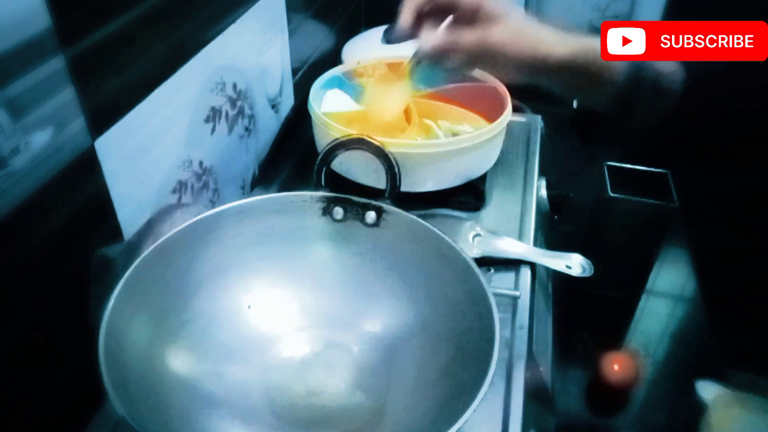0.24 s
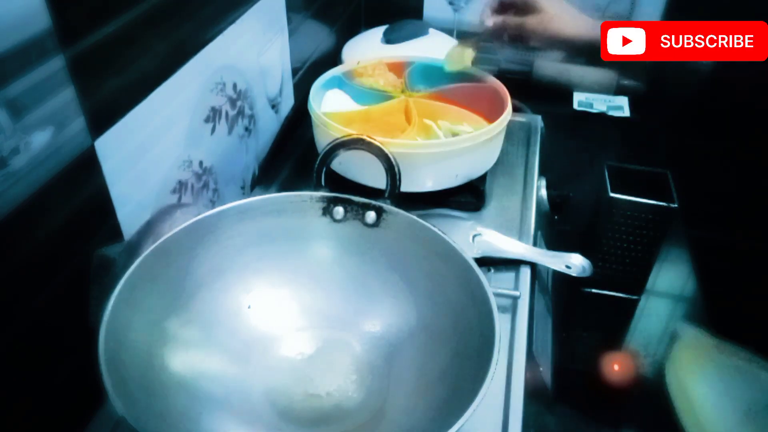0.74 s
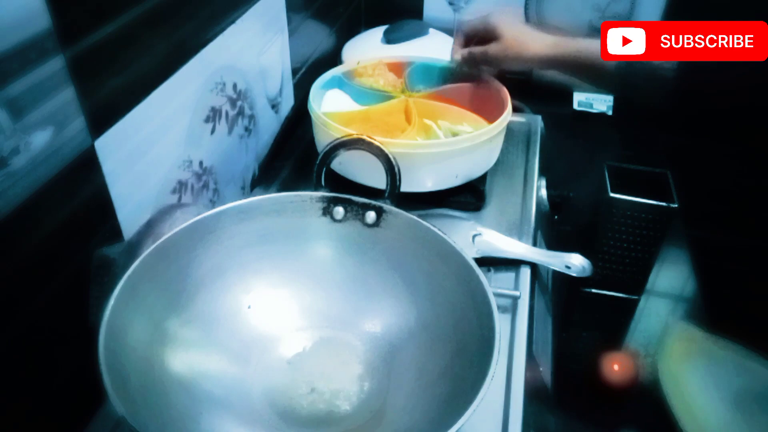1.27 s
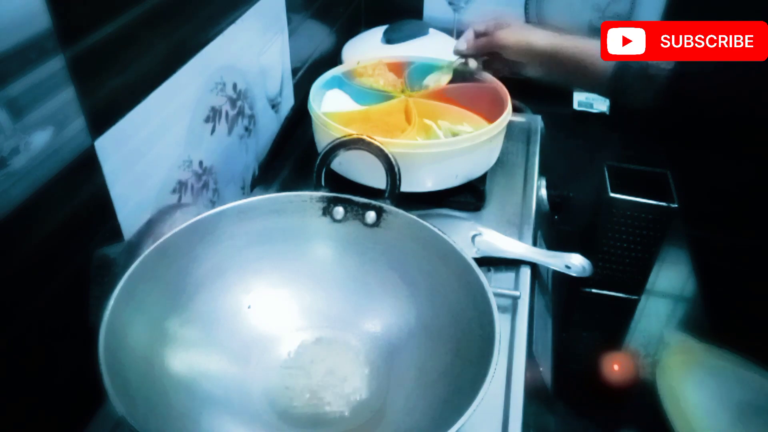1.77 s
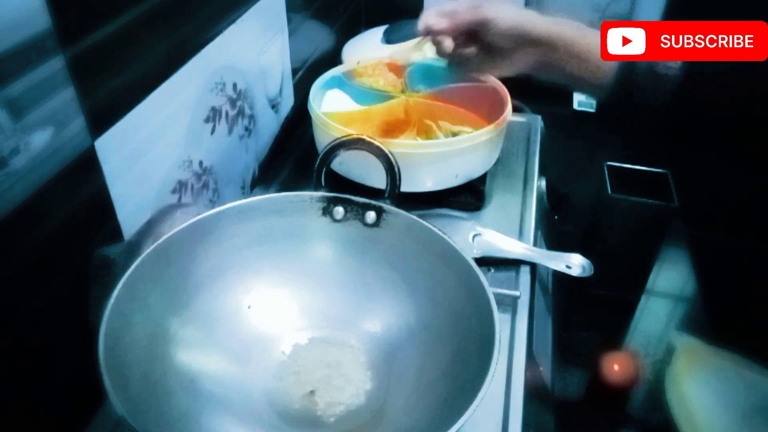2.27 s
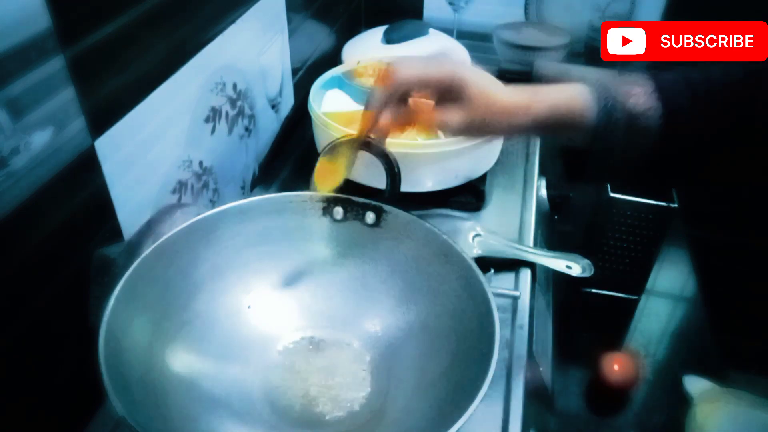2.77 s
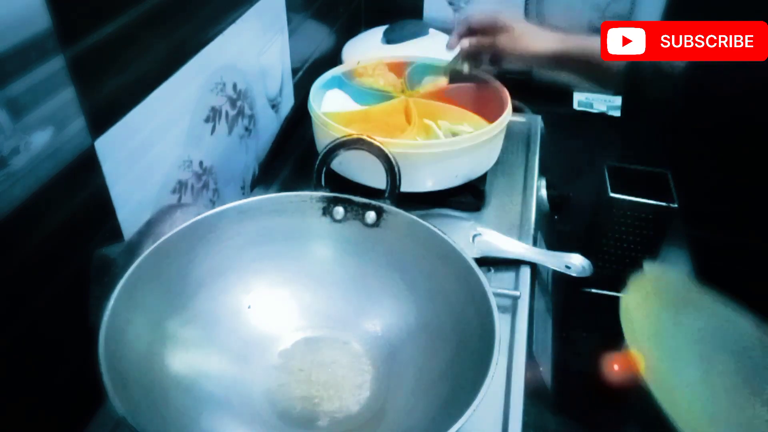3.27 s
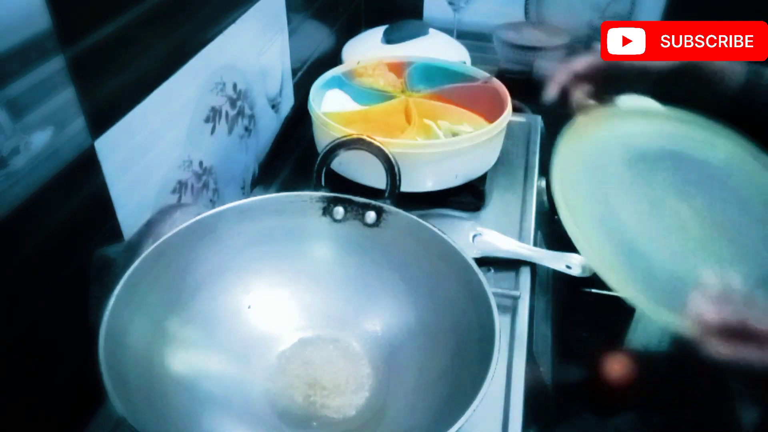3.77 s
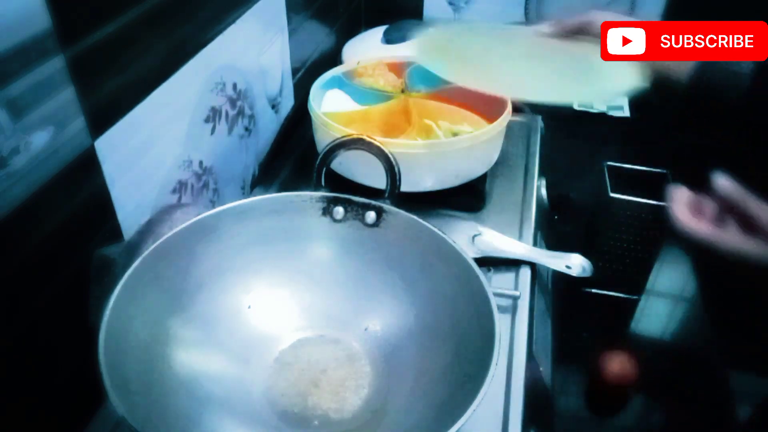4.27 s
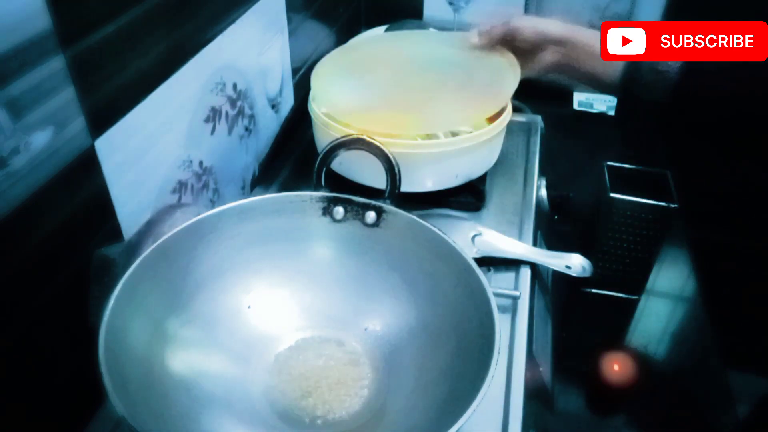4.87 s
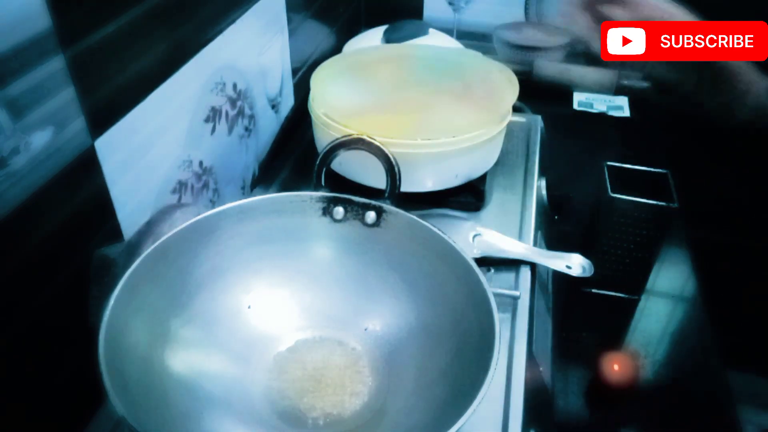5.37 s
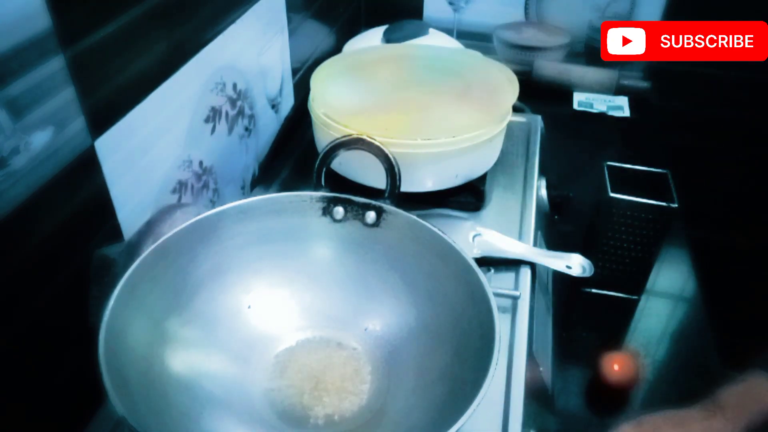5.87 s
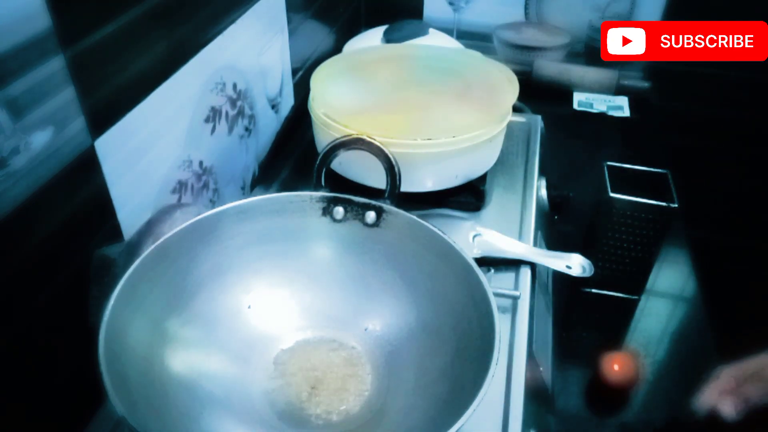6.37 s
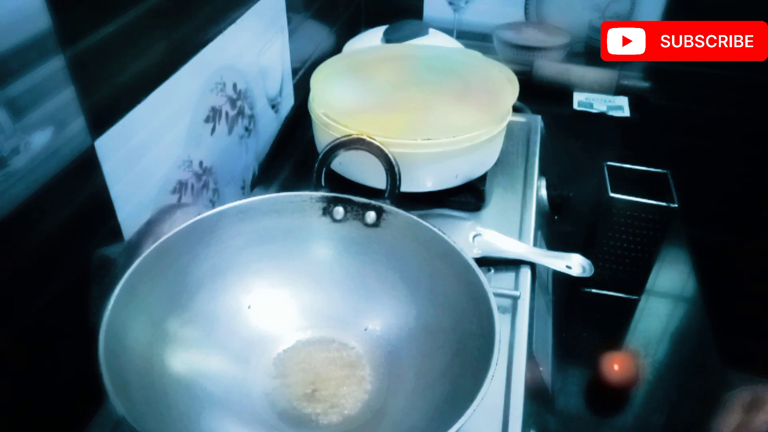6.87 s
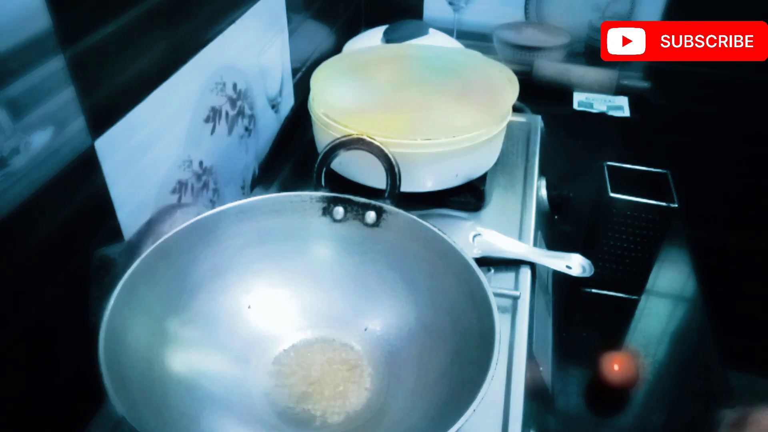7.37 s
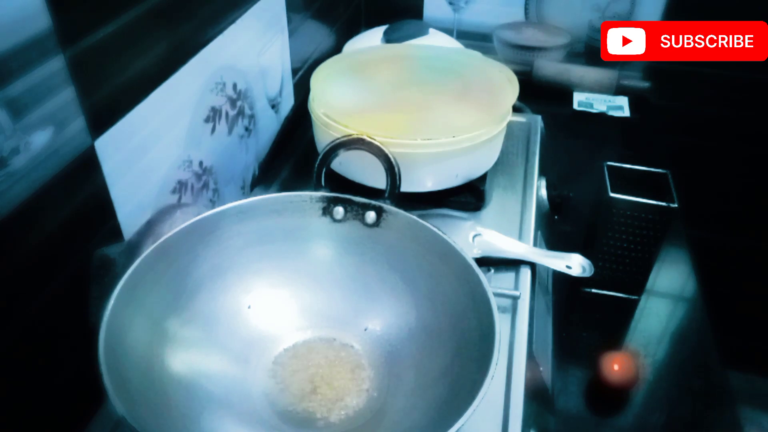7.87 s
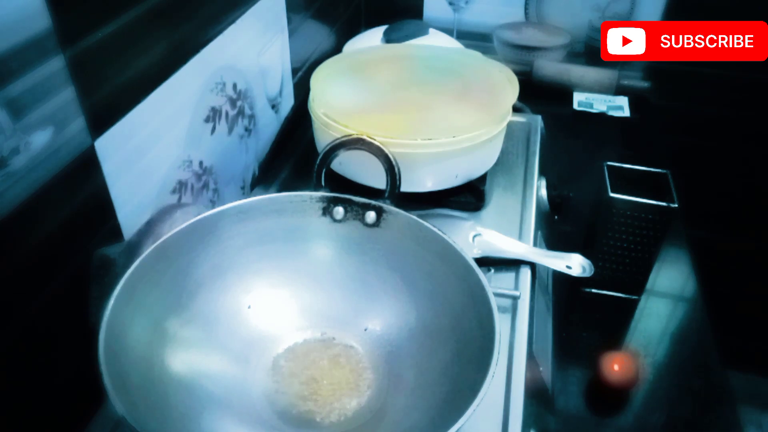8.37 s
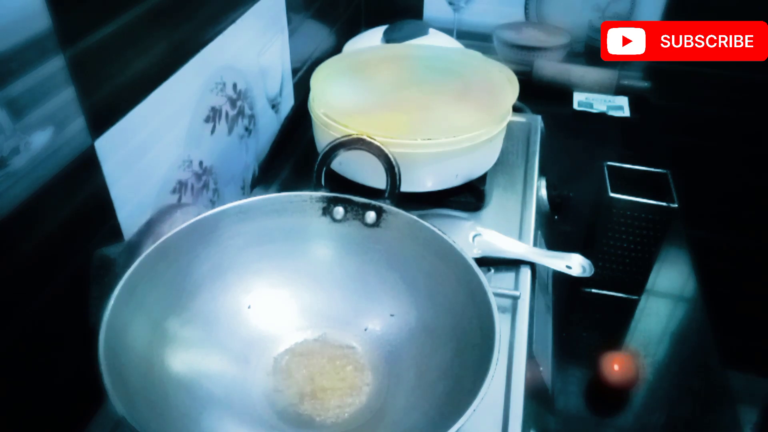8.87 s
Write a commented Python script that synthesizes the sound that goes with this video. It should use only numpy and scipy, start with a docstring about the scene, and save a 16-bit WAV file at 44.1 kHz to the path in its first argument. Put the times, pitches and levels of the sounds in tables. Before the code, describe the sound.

Close, bright seed pops snap in a wok in a small hard kitchen, with faint hiss, a brief spoon clink and hollow plastic lid clunks.

```python
"""Spice seeds popping in hot oil

Spice seeds burst in a wok, close to a phone in a small hard kitchen, over sizzling oil and a low wavering hum.
Each pop is a short crack with a ring, made by giving a spectrum its shortest response; wok and walls answer.
Some pops also thump the microphone with a swing of a few milliseconds.
A spoon drops and a lid settles on a plastic spice box: dying sines, with noisy cracks for every blow on the
box, spoon and lid alike. The sizzle is coloured noise with random bubble clicks; rumble and hum are filtered noise."""
import sys
import numpy as np
from scipy import signal
from scipy.fft import rfft, irfft
from scipy.io import wavfile
from scipy.ndimage import uniform_filter1d

SR = 44100
rng = np.random.default_rng(int(sys.argv[2]) if len(sys.argv) > 2 else 0)


def unload_audio(sound):
    """Save the sound as a 16-bit wav file, at the path given as the first command line argument."""
    columns = np.transpose(np.atleast_2d(sound))
    # keep every value between -1 and 1, then stretch to whole-number steps
    steps = np.round(np.clip(columns, -1, 1) * 32767)
    wavfile.write(sys.argv[1], SR, steps.astype(np.int16))


N = 402191


def undb(db):
    """Decibels to amplitude gain."""
    return 10 ** (np.asarray(db) / 20)


def unit(x):
    """Scale to rms 1."""
    return x / np.sqrt(np.mean(x ** 2))


def even(rows):
    """Give every row energy 1."""
    return rows / np.sqrt((rows ** 2).sum(-1, keepdims=True))


def band(x, lo_hz, hi_hz):
    """Butterworth band-pass."""
    edges_hz = [lo_hz, min(hi_hz, .48 * SR)]
    return signal.sosfilt(signal.butter(2, edges_hz, "band", fs=SR, output="sos"), x)


def curve(table):
    """Turn (time [s], level [dB]) points into a gain per sample."""
    s, db = np.transpose(table)
    return undb(np.interp(np.arange(N) / SR, s, db))


def colour(x, points):
    """Shape noise by (frequency [Hz], level [dB]) points joined on a log-frequency axis."""
    hz, db = np.transpose(points)
    f = np.maximum(np.arange(len(x) // 2 + 1) * SR / len(x), 1)
    gain_db = np.interp(np.log(f), np.log(hz), db, left=-90, right=-90)
    return irfft(rfft(x) * undb(gain_db), len(x))


def walk(rate_hz):
    """Slide between random levels drawn at this rate; spread a little under 1."""
    hold = int(SR / rate_hz)
    steps = np.repeat(rng.standard_normal(N // hold + 1), hold)
    return uniform_filter1d(steps, hold)[:N]


def place(times, sounds):
    """Lay one row of samples at each time."""
    out = np.zeros(N + SR)
    for s, row in zip(times, sounds):
        start = int(s * SR)
        out[start:start + len(row)] += row
    return out[:N]


def burst(count, decay_ms, t):
    """Dying puffs of noise, each of energy 1."""
    return even(rng.standard_normal((count, len(t))) * np.exp(-t / decay_ms * 1000))


def hump(hz, octaves):
    """A bell of power on a log-frequency axis, total 1."""
    f = np.maximum(np.arange(257), .5) * SR / 512
    bell = np.exp(-.5 * (np.log2(f / hz) / np.maximum(octaves, .03)) ** 2) / f
    return bell / bell.sum(-1, keepdims=True)


def causal(power):
    """The shortest (minimum-phase) response with this power spectrum, by folding the cepstrum."""
    floor = 1e-7 * power.max(-1, keepdims=True)
    cepstrum = irfft(.5 * np.log(256 * power + floor))
    cepstrum[:, 1:256] *= 2
    cepstrum[:, 257:] = 0
    return irfft(np.exp(rfft(cepstrum)))


def rings(modes, t):
    """Dying sines, one row per (frequency [Hz], level [dB], t60 [s]) mode; returns frequencies and rows."""
    hz, db, t60 = (c[:, None] for c in np.transpose(modes))
    return hz, undb(db) * np.sin(2 * np.pi * hz * t) * np.exp(-np.log(1000) * t / t60)


# Rumble colour: (frequency [Hz], relative level per Hz [dB])
RUMBLE_COLOUR = [(15, -76), (25, -32.5), (58, -13), (96, -10), (162, -7), (278, -13), (546, -13.5),
                 (578, -12), (866, -14.5), (2500, -31.5), (3250, -52), (5500, -120)]
# Hum level before its random waver: (time [s], level [dB])
HUM_LEVEL = [(0.0, -70.5), (0.33, -84.5), (0.96, -76), (1.6, -82), (1.8, -62.5), (2.0, -89.5),
             (2.77, -73.5), (3.3, -79), (3.83, -86), (4.39, -75), (4.7, -87), (5.08, -56), (5.3, -76),
             (7.6, -85), (7.9, -66), (8.05, -84), (8.28, -74), (8.55, -86), (8.85, -73), (9.12, -93)]
RUMBLE_DB = -78


def air():
    """Noise coloured as room rumble, and a narrow noise band near 94 Hz as a hum that swells and fades."""
    rumble = unit(colour(rng.standard_normal(N + 1), RUMBLE_COLOUR)[:N])
    rumble = rumble * undb(RUMBLE_DB + 0.53 * walk(4))
    hum = unit(band(rng.standard_normal(N), 84.3, 103.7))
    return rumble + hum * curve(HUM_LEVEL) * undb(1.5 * walk(5))


# Hot oil colour: (frequency [Hz], relative level per Hz [dB])
OIL_COLOUR = [(710, -33.5), (1200, -11.5), (1430, -4), (2030, -7), (2530, -2.5), (4010, -7), (4940, -0.5),
              (7410, 1.5), (12100, -16), (15300, -3), (16000, -0.5), (16500, -49.5)]
# Sizzle level before its random flicker: (time [s], level [dB])
SIZZLE_LEVEL = [(0.0, -71.5), (1.5, -60), (1.85, -57), (2.3, -64.5), (2.7, -61), (3.0, -63.5), (4.7, -63.5),
                (6.7, -67.5), (7.6, -65), (8.45, -56.5), (8.8, -73), (9.12, -63)]
BUBBLES_PER_S = 1500


def sizzle():
    """Tiny bubbles of uneven size click at random within a steady hiss, coloured as oil and flickering."""
    size = undb(1.8 * rng.exponential(size=N))
    fires = rng.random(N) < BUBBLES_PER_S / SR
    bubbles = size * fires * rng.standard_normal(N)
    fizz = unit(bubbles) * .5 + rng.standard_normal(N)
    # one extra sample makes the length even for the transform
    hiss = unit(colour(np.append(fizz, 0), OIL_COLOUR)[:N])
    return hiss * curve(SIZZLE_LEVEL) * undb(2.5 * walk(15))


# Kitchen echoes by band: (centre [Hz], t60 [s], level before scaling by root frequency [dB])
ROOM_BANDS = [(232, 0.76, -23.5), (700, 0.33, -24.5), (1940, 0.32, -25), (4770, 0.27, -26.5),
              (8540, 0.38, -31), (11520, 0.13, -33), (16100, 0.13, -30.5)]


def kitchen():
    """Wall echoes as noise: they thicken over the first milliseconds, then each band dies at its own pace."""
    t = np.arange(int(.7 * SR)) / SR
    out = 0
    for hz, t60, db in ROOM_BANDS:
        noise = unit(band(rng.standard_normal(len(t)), hz / 1.57, hz * 1.64)) * np.sqrt(hz / SR)
        out = out + undb(db) * noise * np.exp(-np.log(1000) * t / t60)
    return out * (1 - np.exp(-(t / 0.005) ** 2))


# Spoon modes: (frequency [Hz], relative level [dB], t60 [s])
SPOON_MODES = [(3214, -4, .2), (4005, -4, .2), (5889, -6, .15), (7811, 0, .17), (9744, -4, .17),
               (12660, -16, .15)]
SPOON_S, SPOON_DB = 3.589, -47.5


def spoon():
    """The dropped spoon rings once in a handful of high, quickly dying modes."""
    t = np.arange(int(.8 * SR)) / SR
    return place([SPOON_S], [undb(SPOON_DB) * rings(SPOON_MODES, t)[1].sum(0)])


# Knocks of spoon and lid on the spice box: (time [s], low crack energy [dB], low crack [Hz],
# high crack [Hz], high crack spread [octaves], base pitch [Hz], then against the low crack energy:
# high crack [dB], base [dB], hollow note [dB])
BOX_KNOCKS = [(1.3743, -27, 1470, 1270, 0.2, 256, 2, -30.5, -59),
              (3.5876, -12, 890, 2085, 0.082, 270, -0.5, -31.5, -37.5),
              (3.6617, -37, 850, 2160, 0.2, 260, 3, -48, -32),
              (3.7087, -38, 850, 2170, 0.18, 260, 2, -45, -45),
              (4.894, -10, 600, 1530, 0.54, 171, 0.5, -36.5, -34.5),
              (5.011, -18.5, 625, 1140, 0.44, 200, -9, -23, -37),
              (5.2393, -18.5, 680, 1300, 0.62, 247, -15, -31.5, -26),
              (5.352, -28.5, 700, 1055, .2, 256, -18, -36, -20.5),
              (5.665, -39.5, 656, 1650, .27, 227, 1, -22.5, -44)]
# Box walls: (frequency [Hz], relative level [dB], t60 [s])
BOX_WALLS = [(600, -30, 0.13), (640, 2, .15), (757, 5, 0.068), (1080, -23, .12), (1116, 3.5, 0.16),
             (1370, -7, 0.22)]
# Box base: (frequency [Hz], relative level [dB], t60 [s])
BOX_BASE = [(127.4, 4, 0.76), (155, 2, 0.37), (200, -2.5, 0.27), (241, -7, 0.63), (270, 0.5, 0.4),
            (304.6, -3, 0.88), (364, 4.5, 0.31)]
# Air in the box, a close pair that beats: (frequency [Hz], relative level [dB], t60 [s])
BOX_HOLLOW = [(433.5, 0, .5), (444, -1.5, .5)]
LOW_CRACK_OCTAVES = .46
# click added to the high crack; walls against the low crack energy
CLICK_DB, WALLS_DB = -7.5, -36


def knocks():
    """Each blow is a woody crack in two bands that wakes walls, base and air of the box; returns all, and cracks."""
    t = np.arange(int(.8 * SR)) / SR
    walls = rings(BOX_WALLS, t)[1]
    # the two start against each other, so the note swells first
    hollow = np.subtract(*rings(BOX_HOLLOW, t)[1])
    base_hz, base = rings(BOX_BASE, t)
    swell = 1 - np.exp(-t / 0.0056)
    cracks, notes = [], []
    for s, db, low_hz, high_hz, octaves, pitch_hz, high_db, base_db, hollow_db in BOX_KNOCKS:
        high = hump(high_hz, octaves) + undb(2 * CLICK_DB) * hump(3300, 0.53)
        power = hump(low_hz, LOW_CRACK_OCTAVES) + undb(2 * high_db) * high
        puff = burst(1, 4.5, t[:1500])[0]
        cracks.append(undb(db) * np.convolve(causal(power[None])[0], puff))
        # every blow wakes the wall modes a little differently
        uneven = (undb(2.0 * rng.standard_normal((len(BOX_WALLS), 1))) * walls).sum(0)
        # the place of the blow picks the base modes near one pitch
        nearness = np.exp(-.5 * (np.log2(base_hz / pitch_hz) / .25) ** 2)
        picked = (nearness * base).sum(0)
        tone = swell * (undb(base_db) * picked + undb(hollow_db) * hollow)
        notes.append(undb(db) * (undb(WALLS_DB) * uneven + tone))
    times = np.transpose(BOX_KNOCKS)[0]
    crack_sound = place(times, cracks)
    return crack_sound + place(times, notes), crack_sound


# Wok modes: (frequency [Hz], level [dB], t60 [s])
WOK_MODES = [(600, -47, 0.15), (765.5, -38.5, 0.16), (816, -43, 0.22), (1073, -53, 0.47), (1432, -60, 0.41)]


def wok(sent):
    """The pops strike the metal, which answers with its own dying modes."""
    t = np.arange(SR // 2) / SR
    return signal.fftconvolve(sent, rings(WOK_MODES, t)[1].sum(0))[:N]


# Air blasts of near pops on the microphone: (time [s], swing level [dB])
AIR_BLASTS = [(1.13, -10.5), (1.774, -26.5), (1.892, -44), (2.575, -49), (2.648, -41), (2.754, -42),
              (3.466, -40), (4.201, -64), (4.735, -47), (5.832, -48), (8.237, -35.5), (8.783, -46.5)]


def thumps():
    """A sudden pressure drop at the microphone swings back in one slow, heavily damped overshoot."""
    t = np.arange(SR // 10) / SR
    swing = -np.cos(2 * np.pi * 95 * t + 0.64) * np.exp(-t / 0.0016)
    s, db = np.transpose(AIR_BLASTS)
    # the drop follows the listed time by about a millisecond
    return place(s + 0.001113, undb(db)[:, None] * swing)


# Faint pops, centre and random spread, each: (ring energy [dB], ring [Hz], then against the ring energy:
# body [dB], crack [dB], treble [dB]; room send against the pop [dB])
FAINT_CENTRE = (-43.5, 6398, -18, -12, -11.5, 4)
FAINT_VARIATION = (2.4, 450, 11, 4, 16, 2.2)
FAINT_COUNT = 28


def faint():
    """Small seeds burst at random moments between the loud ones; rows have the columns of LOUD_POPS."""
    draws = rng.standard_normal((FAINT_COUNT, len(FAINT_CENTRE)))
    rows = np.array(FAINT_CENTRE) + np.array(FAINT_VARIATION) * draws
    return np.column_stack([rng.random(FAINT_COUNT) * N / SR, rows])


# Louder seeds bursting: (time [s], ring energy [dB], ring [Hz], then against the ring energy:
# body [dB], crack [dB], treble [dB]; room send against the pop [dB])
LOUD_POPS = [(0.0627, -39.5, 6290, -20, -4, -6, 13.5), (0.3512, -27.5, 7000, -50, -20, -18, -2.5),
             (0.7549, -39, 7150, -35, -12, -22, -4), (0.787, -26, 2600, -7, 0.5, -7, -1.5),
             (0.8754, -33.5, 5880, -32, -6, -12, 4.5), (0.9363, -38.5, 5600, -15, -6, -15, 8),
             (1.0626, -42, 6330, -27, -4, -12, 9), (1.1308, -16, 6800, -2, 1.5, 2, -0.5),
             (1.2332, -27.5, 7200, -28, -7, -17, 2), (1.3397, -31.5, 8360, -15, -8, 2, 3.5),
             (1.4565, -42, 6900, 1, 9, -17, 7), (1.5026, -18.5, 6500, -33, -12, -30, -3),
             (1.5315, -14.5, 5070, -23, -2.5, -26, -1), (1.5833, -25, 5440, -23, -3, -23, 1),
             (1.6166, -16.5, 6300, -15.5, -2.5, -5, 1), (1.6736, -8.5, 3280, -23, -2, -31, -0.5),
             (1.6897, -9.5, 5800, -23, -5.5, -4, -1), (1.7749, -13, 7540, -4.5, -3, -1, -5.5),
             (1.7834, -21, 6760, -19, -21, 0, 1), (1.7888, -17.5, 6930, -14.5, -2.5, -1, 5),
             (1.8944, -14.5, 7500, -20.5, -8.5, 0, 1), (1.9031, -37, 7080, -21, -8, -6, -10),
             (1.9695, -11, 5100, -22, -4, -14, -3), (2.1947, -19.5, 3030, -19, -1, -20, -0.5),
             (2.369, -28, 6300, -17, -1.5, 0, 1.5), (2.4865, -15, 5400, -38, -18, -33, -1),
             (2.5765, -20, 7260, -13, -1, 2.5, 2.5), (2.6493, -15, 7200, -15, -6, -2, 2.5),
             (2.7563, -17.5, 7520, -9.5, -5, 2, 0.5), (2.787, -19, 6940, -14, -1, -7, -2),
             (2.8391, -24.5, 4410, -14.5, -0.5, -29, -3), (3.0179, -32.5, 8830, -13, -6, -8, 3),
             (3.0806, -21.5, 7690, -25.5, -3, -17, -0.5), (3.2101, -37, 7020, -39, -21, -10, 3),
             (3.2729, -27, 7140, -17, -4, 0, 1), (3.3512, -31, 8600, -16.5, -11, -15, -3),
             (3.3769, -34, 6900, -4.5, -0.5, -18, 3), (3.4674, -22.5, 6900, -9.5, -5.5, 3, 2.5),
             (3.8062, -44, 6610, -14, -8, -9, -10), (3.874, -12.5, 6300, -17, -2.5, -3, -1),
             (4.0281, -33, 5530, -10, -6, -27, 7), (4.0485, -12.5, 2900, -25, -8, -30, -3.5),
             (4.0773, -25.5, 6860, -18, -4.5, -13, 4.5), (4.1595, -32, 6000, -28, -13, -14, 2),
             (4.202, -21, 5800, -15, 0, 6, -1.5), (4.2937, -27, 7300, -17, -1, -7, -2),
             (4.34, -18, 6300, -28, -14, -18, -2), (4.4053, -7.5, 6840, -28, -8, -14, -3.5),
             (4.6392, -18, 8700, -22, -4.5, -1, 1.5), (4.6479, -18.5, 7300, -20.5, -10, -5, -1),
             (4.7338, -21, 7100, -16.5, -8, -15, 8), (4.739, -4, 4140, -29, -4.5, -9, -2.5),
             (5.0989, -5, 5530, -22.5, -4, -24, 1), (5.2771, -18.5, 6130, -27, -7, -21, -2.5),
             (5.3995, -36, 6870, -1.5, -1, -3, 8.5), (5.4135, -27, 5640, -21, -3, -23, -6),
             (5.4325, -15.5, 5000, -15, -5.5, -34, -1.5), (5.6937, -32, 6600, -26, -12, -3, -4),
             (5.8338, -20, 6900, -15.5, -4.5, 3.5, -0.5), (6.0446, -35.5, 7130, -4, -3.5, 3, 2),
             (6.0874, -32, 7000, -17, -6, 5, -4), (6.2203, -31, 7400, -13, -8, 3, 2),
             (6.2444, -25.5, 4760, -16, -9, -25, 2), (6.2883, -31.5, 6400, -20, -7, -11, 12),
             (6.2999, -13, 4470, -39, -18, -24, -2), (6.3218, -22, 7210, -16, -4, 5, 1),
             (6.3772, -38.5, 4330, -0.5, -8, -15, 5.5), (6.4053, -13, 5960, -31, -13.5, -21, -1),
             (6.6065, -17, 7400, -16.5, -4.5, -2, 2), (6.6193, -14, 6260, -22.5, -4.5, -23, 1),
             (6.7035, -21.5, 6400, -39, -22, -17, -4), (6.9724, -28, 6200, -16.5, -6, -19, 4.5),
             (7.0862, -31.5, 7500, -9.5, -2, 3, 2.5), (7.0951, -33, 7580, -21, -14, 1, -5),
             (7.2495, -37, 7020, -17, -6, -6, 1), (7.3697, -37, 6420, -17, -15, -1, 3),
             (7.4384, -22.5, 5100, -18, -4.5, -31, 3.5), (7.4661, -31, 5450, -0.5, -3, -10, 1.5),
             (7.5072, -23, 7100, -36, -7, -7, 2.5), (7.5323, -16.5, 5100, -25, -5, -27, 2.5),
             (7.5474, -24.5, 5210, -2, -1, 0, 0), (7.57, -19, 7450, -14, -1, -3, 0.5),
             (7.7068, -17, 5070, -18, -6, -24, 6.5), (7.853, -19, 7200, -19, -4, -1, 1.5),
             (7.9314, -19, 6840, -25, -6, -8, 3), (7.9466, -20.5, 7100, -16.5, -8, 2.5, 0),
             (7.9866, -15, 5250, -43, -21, -26, -3.5), (8.1359, -33.5, 6930, -8, 5.5, -2, -6),
             (8.1718, -33, 7080, 4, 2.5, -10, -4), (8.2354, -24, 7550, -4, 0.5, 6, -0.5),
             (8.2592, -15, 5000, -29, -8, -26, 3), (8.3348, -25.5, 4900, -15, -4, -5, 7),
             (8.3398, -11.5, 6900, -30, -8, -5, -2), (8.4084, -30, 4760, -23, 5, -27, 3.5),
             (8.4141, -30, 6480, -16.5, -4.5, 2, 9.5), (8.4797, -25.5, 6900, -13, -3.5, -26, -1),
             (8.5079, -35.5, 6480, -3, 7, 2, -1), (8.5765, -24.5, 7800, -22, -6, -4, 8),
             (8.5833, -15.5, 5900, -37, -6, -27, -3.5), (8.6798, -22, 6400, -15, -1, -16, 1),
             (8.6959, -15, 6160, -31, -9, -22, -5), (8.741, -30, 6200, -10.5, -3, 2, 3),
             (8.7827, -16, 6960, -21, -11, 0, -4), (8.7964, -21, 6160, -31, -7.5, -19, 0.5),
             (8.9517, -14, 5000, -24, -7.5, -14, -0.5), (9.0287, -16, 5730, -25.5, -7.5, -31, 1.5),
             (9.0935, -13.5, 5300, -38, -13, -33, 0.5)]
# Broad parts of every burst, in rows body, crack, edge, top: (centre [Hz], spread [octaves])
SHELL_PARTS = [(1100, 0.79), (4200, 0.64), (10800, 0.57), (15300, .06)]
# fainter pops ring over a wider band
RING_OCTAVES, OCTAVES_PER_DB = 0.2, .004
# the edge band follows the treble setting (dB, dB per dB); the room hears more of both treble bands
EDGE_DB, EDGE_PER_TREBLE, ROOM_LIFT_DB = -4.5, 0.97, 2


def pops(table):
    """The steam pocket rings a few cycles while the shell cracks; returns direct sound and what the walls get."""
    s, db, hz, body_db, crack_db, treble_db, room_db = (c[:, None] for c in np.transpose(table))
    body, crack, edge, top = (hump(*part) for part in SHELL_PARTS)
    ring = hump(hz, RING_OCTAVES - OCTAVES_PER_DB * db)
    core = ring + undb(2 * crack_db) * crack
    low = undb(2 * body_db) * body
    edge_db = EDGE_DB + EDGE_PER_TREBLE * treble_db
    high = undb(2 * edge_db) * edge + undb(2 * treble_db) * top
    t = np.arange(200) / SR
    # towards the microphone the wok's walls add a ragged millisecond; the room hears the plain snap
    ragged = even((t == 0) + 1.92 * burst(len(s), 1.0, t))
    near = signal.fftconvolve(causal(core + low + high), ragged, axes=1)
    far = causal(core + 0.57 * low + undb(2 * ROOM_LIFT_DB) * high)
    return place(s[:, 0], undb(db) * near), place(s[:, 0], undb(db + room_db) * far)


SIDE_DB, SIDE_LOW_CUT_HZ = -26, 4500


def scene():
    """Mix the sources in the kitchen, almost mono."""
    seeds = np.vstack([LOUD_POPS, faint()])
    near, sent = pops(seeds)
    box, cracks = knocks()
    echoes = signal.fftconvolve(sent + undb(3) * cracks, kitchen())[:N]
    mid = near + wok(sent) + box + spoon() + thumps() + echoes + sizzle() + air()
    # a second, treble-only draw of the pops, faint, added left and subtracted right
    other = pops(seeds)[0]
    side = undb(SIDE_DB) * band(band(other, SIDE_LOW_CUT_HZ, SR), SIDE_LOW_CUT_HZ, SR)
    return np.array([mid + side, mid - side])


BASS_CUT_HZ, TOP_HZ = 55, 15900


def record(dry):
    """The phone cuts the deep bass and, steeply, the top."""
    dry = signal.sosfilt(signal.butter(2, BASS_CUT_HZ, "high", fs=SR, output="sos"), dry)
    return signal.sosfilt(signal.ellip(10, .3, 70, TOP_HZ, fs=SR, output="sos"), dry)


dry = scene()
out = record(dry)
unload_audio(out)
```